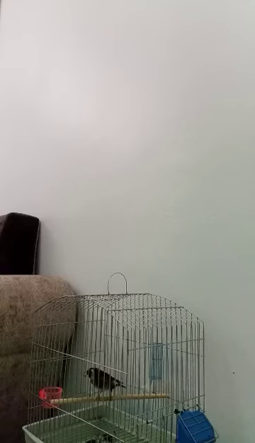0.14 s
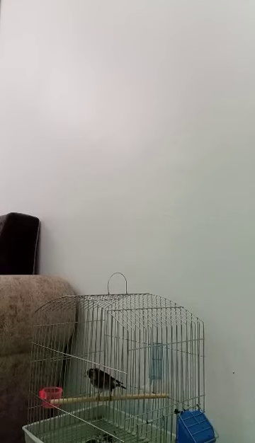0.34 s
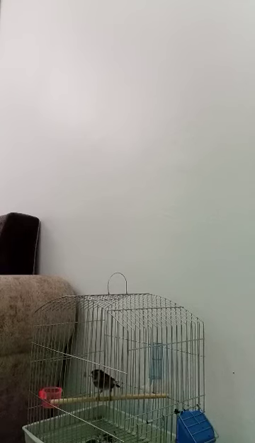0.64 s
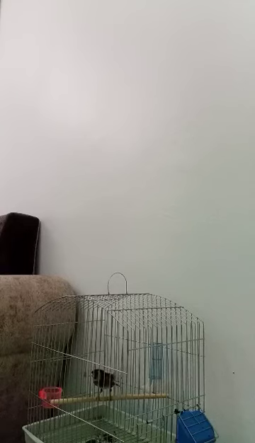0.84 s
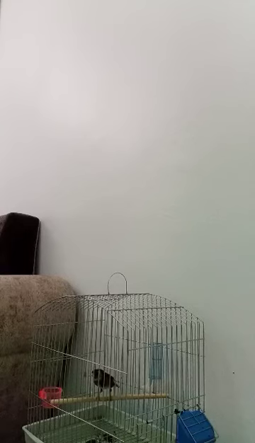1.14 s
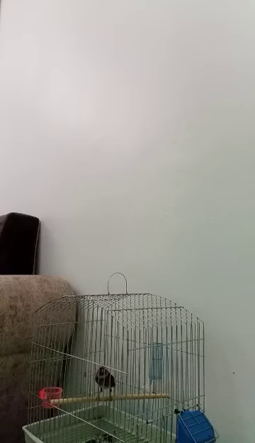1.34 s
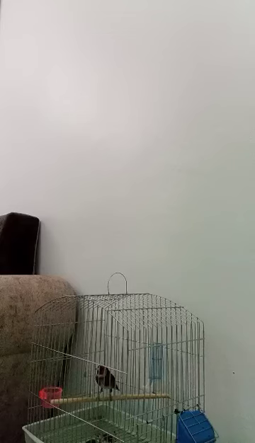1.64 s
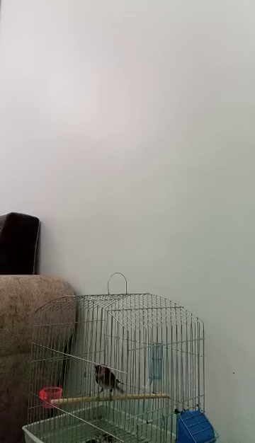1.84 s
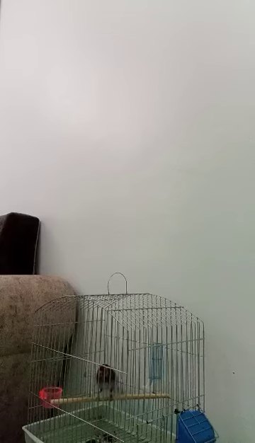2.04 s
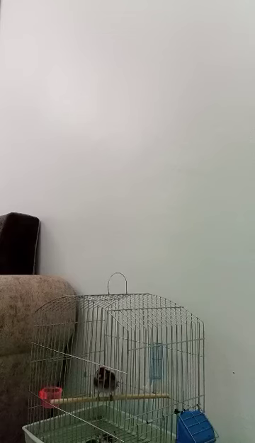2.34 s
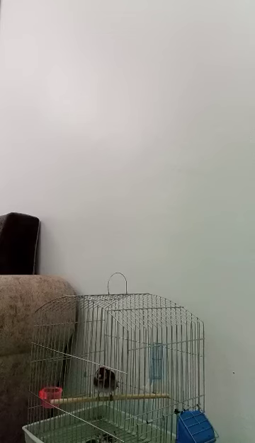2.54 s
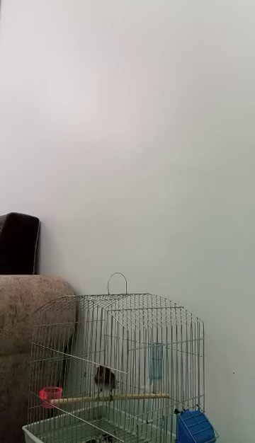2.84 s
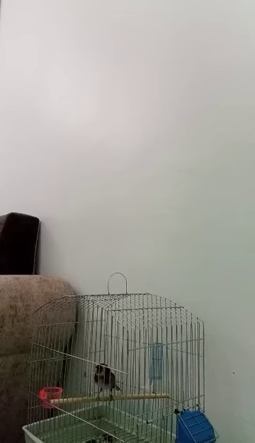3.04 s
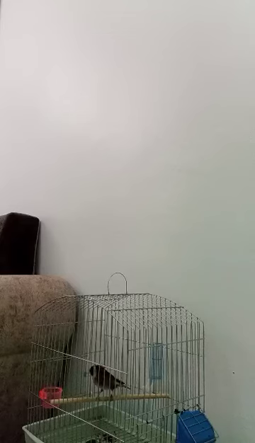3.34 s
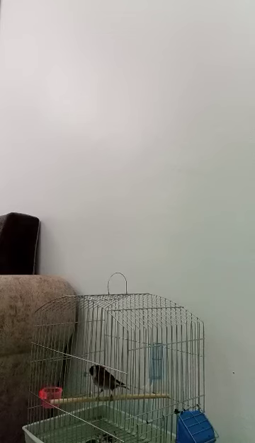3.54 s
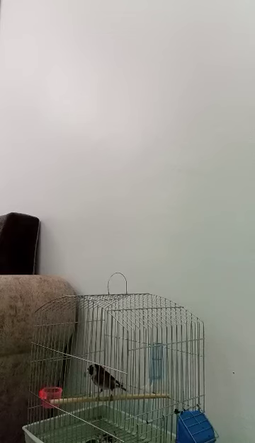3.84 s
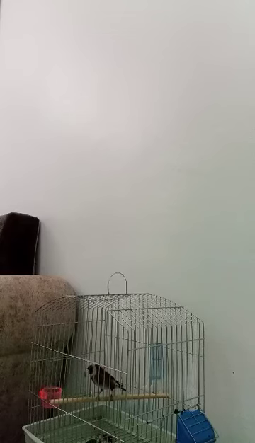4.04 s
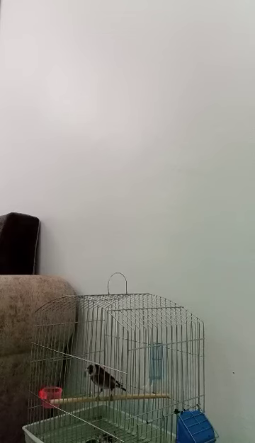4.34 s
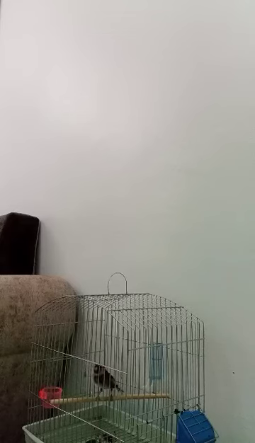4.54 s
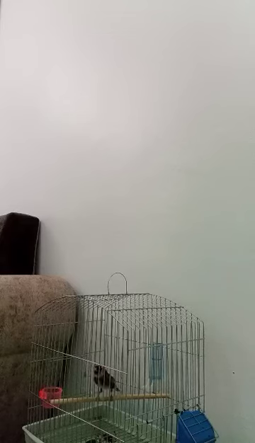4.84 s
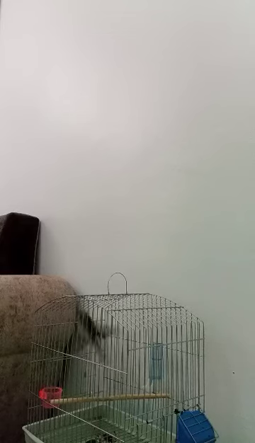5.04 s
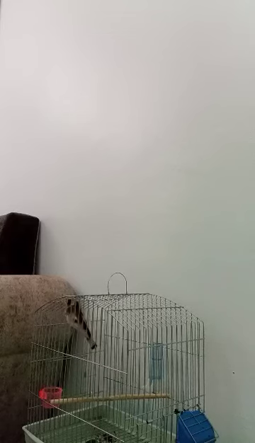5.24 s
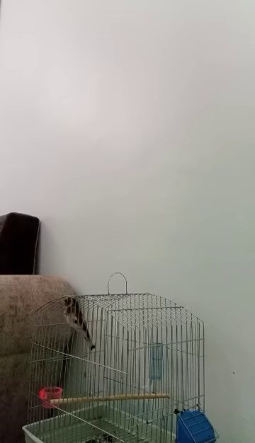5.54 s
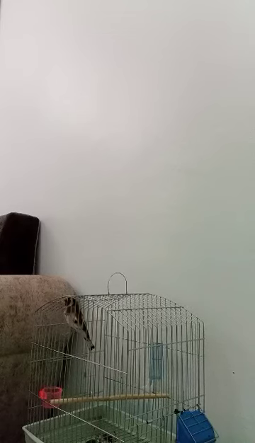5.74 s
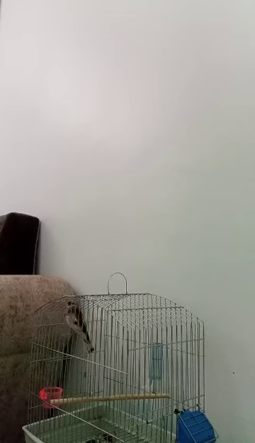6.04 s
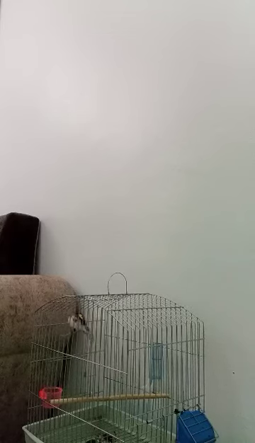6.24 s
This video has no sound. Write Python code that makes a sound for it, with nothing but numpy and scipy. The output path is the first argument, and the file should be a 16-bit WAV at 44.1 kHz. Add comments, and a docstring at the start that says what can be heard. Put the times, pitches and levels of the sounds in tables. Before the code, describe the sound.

Short, clear finch chirps, single and paired, echo off bare indoor walls over a faint low hum, with a tiny cage rattle and weak closing chips.

```python
"""A goldfinch calls in a wire cage: quick whistles, each a nearly pure swept tone with overtones and rasp.
It flutters (shaped, dull noise); claws make the bars ring faintly (decaying sines); low noise swells with notes.
The quiet, bare-walled room adds early echoes and a diffuse tail (convolution with shaped noise).
Behind lie a swaying room tone and a low hum; three soft, reedy chips end the scene."""
import sys
import numpy as np
from scipy import signal
from scipy.fft import rfft, irfft
from scipy.io import wavfile
from scipy.ndimage import uniform_filter1d

SR = 44100
rng = np.random.default_rng(int(sys.argv[2]) if len(sys.argv) > 2 else 0)


def unload_audio(sound):
    """Save the sound as a 16-bit wav file, at the path given as the first command line argument."""
    columns = np.transpose(np.atleast_2d(sound))
    # keep every value between -1 and 1, then stretch to whole-number steps
    steps = np.round(np.clip(columns, -1, 1) * 32767)
    wavfile.write(sys.argv[1], SR, steps.astype(np.int16))


N = 281358
LEAD_SAMPLES = SR // 4   # song before time zero, whose tails still ring

# Note levels are relative: sing() adds a gain, a shape and a swell. Overtones are relative to the note.
# Rising twits: start_s, start_hz, level_db, overtone_db
TWIT_NOTES = [(.7956, 2464, -23, -33.5), (1.7112, 1923, -31.5, -28.5), (1.882, 2470, -24.5, -29.5),
              (2.0425, 2480, -20.5, -25), (3.3805, 2584, -19, -35), (3.4873, 2810, -21, -34),
              (4.897, 2480, -20.5, -33.5), (4.9846, 2512, -20, -35), (5.0802, 2347, -24.5, -24),
              (5.1801, 2188, -24, -27.5)]
# Two-note calls, a thin "tsee" and a slurred "wee": tsee_start_s, tsee_start_hz, tsee_end_hz,
# tsee_level_db, tsee_overtone_db, wee_after_s, wee_level_db, facing_microphone_db
TWO_NOTE_CALLS = [(-.108, 5710, 5420, -30, -35, 0.067, -23, -.5),
                  (0.5565, 5210, 5260, -29.3, -22.5, 0.071, -21.5, -1),
                  (2.9016, 5666, 5410, -25.5, -27.5, 0.062, -20.5, -.5),
                  (3.847, 5635, 5238, -23.5, -33, .0631, -19.3, 3)]
# Soft chips: start_s, length_s, start_hz, end_hz, level_db, overtone_db
CHIP_NOTES = [(1.3936, 0.021, 2158, 2693, -33, -25.5), (5.9724, 0.031, 1950, 3289, -37, -20),
              (6.1753, .0339, 1920, 3400, -38.5, -17.5), (6.3107, .036, 1920, 3310, -43, -19)]
# Gesture of each kind of note: length_share, glide_share, level_db
TWIT_GESTURE = [(0, 0.01, -26), (.2, .16, -16.5), (.35, .41, 0), (.5, 0.64, -1), (.65, 0.825, -3.5),
                (.82, 0.99, -5.5), (1.001, 0.98, -16.5)]
TSEE_GESTURE = [(0, 0.016, -23.5), (.25, 0.369, -10.5), (.6, .75, 1.5), (1, 0.96, -10)]
WEE_GESTURE = [(0, 0.072, -22.5), (.15, 0.13, -17.5), (.4, .48, -26), (.62, .68, -14.5), (.78, .82, 1.4),
               (.92, 1.0252, -2), (1, 0.983, -9.5)]
CHIP_GESTURE = [(0, 0.0225, -10.5), (.2, 0.1316, -1.5), (.45, .5, -1.5), (.7, .85, -0.5), (1, 0.97, -11.5)]
# Bouts of wingbeats and shuffling: start_s, length_s, first_beat_db
FLUTTER_BOUTS = [(1.012, .03, -67), (2.137, .2, -60), (5.071, .2, -56), (5.995, .09, -59), (6.18, .14, -63)]
# Relative spectrum of the wingbeats and the low swells: freq_hz, density_db_per_hz
DULL_SPECTRUM = [(25, -14.5), (50, 0), (85, 11), (150, -2.5), (280, 6), (400, -1.5), (600, -6), (900, -5.5),
                 (2000, -10), (4500, -23), (7000, -22), (12000, -46.5)]
# Claws on the bars: start_s, relative_level_db
CLAW_CATCHES = [(5.105, -65), (5.232, -57.5), (5.275, -56), (6.015, -63)]
# Groups of wires that ring at nearly one pitch: centre_hz, spread_hz, relative_level_db, t60_s
WIRE_GROUPS = [(499, 53, -4.5, 1), (903.6, 121, -2, 0.35), (1510, 160, -0.5, 0.65)]
# Early echoes from cage, wall and furniture: delay_s, level_db
EARLY_ECHOES = [(.0021, -13), (.004, -16), (0.015, -14.5), (.021, -15.5), (0.0264, -15), (0.042, -13)]
# Ring of the room: freq_hz, t60_s
ROOM_RING = [(300, 0.42), (2000, .44), (3500, 0.39), (5500, 0.39), (8000, 0.16), (12000, .28)]
# Relative spectrum of the room tone: freq_hz, density_db_per_hz
ROOM_TONE_SPECTRUM = [(20, -31.5), (32, -17), (55, 2), (140, -5.5), (320, -5), (510, -9), (770, -15),
                      (880, -13.5), (1000, -17), (2000, -20), (3500, -27), (5000, -38.5), (7000, -44),
                      (9000, -53.5)]
# Hum level before hum_gain_db: time_s, relative_level_db
HUM_CURVE = [(0, -73), (2.5, -69.5), (3.6, -80), (4.3, -70), (5.25, -65), (5.55, -72), (6.38, -72.5)]

# LATENESS: exponent on time in the glide (1 = even). SWELL: rise over the note.
TWIT_S, TWIT_FACING_DB = .0243, -1.0
# A twit begun below the easy pitch lingers, blooms later and ends lower, per Hz of shortfall.
EASY_HZ, EASY_END_HZ, EASY_LATENESS, EASY_SWELL_DB = 2446, 4303, .92, -8
LINGER_PER_HZ, BLOOM_DB_PER_HZ, END_DROP_HZ_PER_HZ = .00105, .0741, .4
TSEE_S, TSEE_LATENESS, TSEE_SWELL_DB = .021, 1.15, 1.5
WEE_S, WEE_START_HZ, WEE_END_HZ = .0558, 2230, 3222.5
WEE_LATENESS, WEE_SWELL_DB, WEE_OVERTONE_DB = .74, -.7, -41
# A chip swells if it lies below its strongest pitch and fades if above.
CHIP_LATENESS, CHIP_STRONGEST_HZ, CHIP_SWELL_DB_PER_HZ = .87, 2565, .116
LOW_SWELL_DB, LOW_SWELL_S, LOW_SWELL_TOP_HZ = -66, .26, 1100
WINGBEAT_S, STROKE_S, BEAT_LOSS_DB = .057, .086, .8
AIR_DB = -63.5
CUTOFF_HZ = 13050


def from_db(db):
    """Decibels to gain."""
    return 10 ** (np.asarray(db) / 20)


def rms_one(x):
    """Scale to unit rms."""
    return x / np.sqrt(np.mean(x ** 2) + 1e-20)


def at_hz(points, hz):
    """Read a table on a log-frequency axis."""
    freqs_hz, values = np.transpose(points)
    return np.interp(np.log(np.maximum(hz, 1)), np.log(freqs_hz), values)


def noise(spectrum, size):
    """Noise of a given spectrum, rms 1."""
    hz = np.arange(size // 2 + 1) * SR / size
    white = rfft(rng.standard_normal(size))
    return rms_one(irfft(white * from_db(at_hz(spectrum, hz)), size))


def waver(rate_hz, size):
    """Random motion about zero: straight lines between unit-spread normal draws."""
    steps = np.arange(size) * rate_hz / SR
    return np.interp(steps, np.arange(1024), rng.standard_normal(1024))


def add(track, start_s, sound):
    """Mix a sound into the track at start_s."""
    start = max(0, LEAD_SAMPLES + round(start_s * SR))
    part = sound[:max(0, len(track) - start)]
    track[start:start + len(part)] += part


def sing(notes, gesture, gain_db, second_db, third_db, fourth_db, overtone_growth, jitter, rasp_db, edge_s):
    """The syrinx sweeps one nearly pure tone per note; returns sound all round and towards the microphone."""
    all_round, direct = out = np.zeros((2, LEAD_SAMPLES + N))
    along, glide, gesture_db = np.transpose(gesture)
    rasp_spectrum = [(500, -14.5), (2500, -2), (6000, -1), (13000, -20.5)]   # freq_hz, density_db_per_hz
    for (start_s, length_s, start_hz, end_hz, lateness,
         level_db, swell_db, overtone_db, facing_db) in notes:
        u = np.linspace(0, 1, max(8, round(length_s * SR)))
        hz = start_hz + (end_hz - start_hz) * np.interp(u ** lateness, along, glide)
        jittered_hz = hz * (1 + jitter * waver(1000, len(u)))
        phase = 2 * np.pi * np.cumsum(jittered_hz) / SR

        edge_distance_s = np.minimum(u, 1 - u) * length_s
        gate = np.sin(np.pi / 2 * np.clip(edge_distance_s / edge_s, 0, 1)) ** 2
        push = from_db(swell_db * (u - .5) + np.interp(u, along, gesture_db))

        overtones = (from_db(second_db) * np.sin(2 * phase)
                     + from_db(third_db) * np.sin(3 * phase)
                     + from_db(fourth_db) * np.sin(4 * phase))
        rasp = from_db(rasp_db) * noise(rasp_spectrum, SR // 8)[:len(u)]
        # the throat favours the fundamental as the note swells, so its weak edges are the reediest
        reed = from_db(overtone_db) * push ** overtone_growth * (overtones + rasp)
        note = from_db(gain_db + level_db) * gate * (push * np.sin(phase) + reed)
        add(all_round, start_s, note)
        add(direct, start_s, from_db(facing_db) * note)   # head turn changes only the direct sound
    return out


def twits():
    """Quick upsweeps of one kind; one begun low takes longer to reach full voice."""
    for start_s, start_hz, level_db, overtone_db in TWIT_NOTES:
        short_hz = max(0, EASY_HZ - start_hz)
        end_hz = EASY_END_HZ - END_DROP_HZ_PER_HZ * short_hz
        lateness = EASY_LATENESS + LINGER_PER_HZ * short_hz
        swell_db = EASY_SWELL_DB + BLOOM_DB_PER_HZ * short_hz
        yield (start_s, TWIT_S, start_hz, end_hz, lateness,
               level_db, swell_db, overtone_db, TWIT_FACING_DB)


def tsees():
    """The high, short opening note of each two-note call."""
    for start_s, start_hz, end_hz, level_db, overtone_db, _, _, facing_db in TWO_NOTE_CALLS:
        yield (start_s, TSEE_S, start_hz, end_hz, TSEE_LATENESS,
               level_db, TSEE_SWELL_DB, overtone_db, facing_db)


def wees():
    """The closing slur, swept alike in every call; timing and strength vary."""
    for start_s, *_, after_s, level_db, facing_db in TWO_NOTE_CALLS:
        yield (start_s + after_s, WEE_S, WEE_START_HZ, WEE_END_HZ, WEE_LATENESS,
               level_db, WEE_SWELL_DB, WEE_OVERTONE_DB, facing_db)


def chips():
    """Low, reedy upsweeps that strengthen towards one favoured pitch."""
    for start_s, length_s, start_hz, end_hz, level_db, overtone_db in CHIP_NOTES:
        middle_hz = (start_hz + end_hz) / 2
        swell_db = CHIP_SWELL_DB_PER_HZ * (CHIP_STRONGEST_HZ - middle_hz)
        yield (start_s, length_s, start_hz, end_hz, CHIP_LATENESS,
               level_db, swell_db, overtone_db, 0)


def song():
    """All four kinds of note, each with its own gesture and reediness."""
    out = sing(twits(), TWIT_GESTURE, gain_db=.94, second_db=-2, third_db=-13.5, fourth_db=-30,
               overtone_growth=.58, jitter=.0011, rasp_db=-10, edge_s=.0022)
    out += sing(tsees(), TSEE_GESTURE, gain_db=0, second_db=-1, third_db=-30, fourth_db=-40,
                overtone_growth=.4, jitter=.002, rasp_db=-13.5, edge_s=.0023)
    out += sing(wees(), WEE_GESTURE, gain_db=.5, second_db=-1, third_db=-9.5, fourth_db=-25,
                overtone_growth=.85, jitter=.006, rasp_db=-17.5, edge_s=.0017)
    out += sing(chips(), CHIP_GESTURE, gain_db=.33, second_db=.5, third_db=-15, fourth_db=-36,
                overtone_growth=.8, jitter=.0044, rasp_db=-14, edge_s=.0015)
    return out


def feathers(grain_db=3.5):
    """Wings beat evenly, ever weaker through a bout; each stroke is a soft puff of air with a grainy rustle."""
    out = np.zeros(LEAD_SAMPLES + N)
    stroke = np.hanning(round(STROKE_S * SR))
    for start_s, length_s, first_beat_db in FLUTTER_BOUTS:
        for beat, after_s in enumerate(np.arange(0, length_s, WINGBEAT_S)):
            grain = from_db(grain_db * waver(400, SR // 4))
            rustle = noise(DULL_SPECTRUM, SR // 4) * grain
            beat_db = first_beat_db - BEAT_LOSS_DB * beat
            add(out, start_s + after_s, from_db(beat_db) * stroke * rustle[:len(stroke)])
    return out


def cage(ring_db=-13.5, count=14):
    """Claws catch the bars: each wire keeps its pitch and takes a random strength at each catch."""
    out = np.zeros(LEAD_SAMPLES + N)
    t = np.arange(SR) / SR
    for centre_hz, spread_hz, group_db, t60_s in WIRE_GROUPS:
        wire_hz = rng.normal(centre_hz, spread_hz, (count, 1))
        wires = np.sin(2 * np.pi * wire_hz * t) * from_db(-60 * t / t60_s)
        for start_s, claw_db in CLAW_CATCHES:
            strengths = rng.standard_normal(count)
            add(out, start_s, from_db(ring_db + claw_db + group_db) * (strengths @ wires))
    return out


def low_swells():
    """A dull low noise swells and fades from the onset of each twit and slur."""
    out = np.zeros(LEAD_SAMPLES + N)
    swell = np.hanning(round(LOW_SWELL_S * SR))
    for start_s, *_ in [*twits(), *wees()]:
        add(out, start_s, from_db(LOW_SWELL_DB) * swell * noise(DULL_SPECTRUM, len(swell)))
    return signal.sosfilt(signal.butter(2, LOW_SWELL_TOP_HZ, fs=SR, output="sos"), out)


def room(x, tail_db=-3.0, build_s=.0053, treble_db=-1.5):
    """A few distinct echoes plus a diffuse tail whose decay time varies with frequency."""
    t, hz = np.arange(SR) / SR, np.arange(SR // 2 + 1)
    white = rfft(rng.standard_normal(SR))
    tail = np.zeros(SR)
    for centre_hz, t60_s in ROOM_RING:
        share = at_hz([(f, f == centre_hz) for f, _ in ROOM_RING], hz)
        tail += irfft(white * share, SR) * from_db(-60 * t / t60_s)
    tail = rfft(tail * (1 - np.exp(-t / build_s)))
    # the tail is evened out, so neighbouring pitches ring about equally long and loud
    tail /= np.sqrt(uniform_filter1d(np.abs(tail) ** 2, size=60))
    colour_db = tail_db + at_hz([(4500, 0), (9000, treble_db)], hz)
    response = irfft(tail * from_db(colour_db), SR)[:SR * 3 // 4]
    for delay_s, echo_db in EARLY_ECHOES:
        response[round(delay_s * SR)] += from_db(echo_db)
    return signal.fftconvolve(x, response)[LEAD_SAMPLES:LEAD_SAMPLES + N]


def background(sway_db=1.55, hum_hz=83, hum_gain_db=4.0):
    """Dull room tone whose low part sways, and a low hum of two wavering quadrature sines."""
    t = np.arange(N) / SR
    air = noise(ROOM_TONE_SPECTRUM, N)
    low = signal.sosfilt(signal.butter(1, 700, fs=SR, output="sos"), air)
    air = air + low * (from_db(sway_db * waver(10, N)) - 1)
    hum_db = hum_gain_db + np.interp(t, *np.transpose(HUM_CURVE))
    phase = 2 * np.pi * hum_hz * t
    hum = waver(14, N) * np.sin(phase) + waver(13, N) * np.cos(phase)
    return from_db(AIR_DB) * air + from_db(hum_db) * hum


def scene():
    """Bird, cage and low swells sound directly and through the room, over its quiet background."""
    all_round, direct = song() + feathers() + low_swells() + cage()
    return (direct[LEAD_SAMPLES:] + room(all_round) + background())[None]


def record(dry):
    """Steep elliptic low-pass at the top."""
    return signal.sosfilt(signal.ellip(10, .2, 80, CUTOFF_HZ, fs=SR, output="sos"), dry)


dry = scene()
out = record(dry)
unload_audio(out)
```